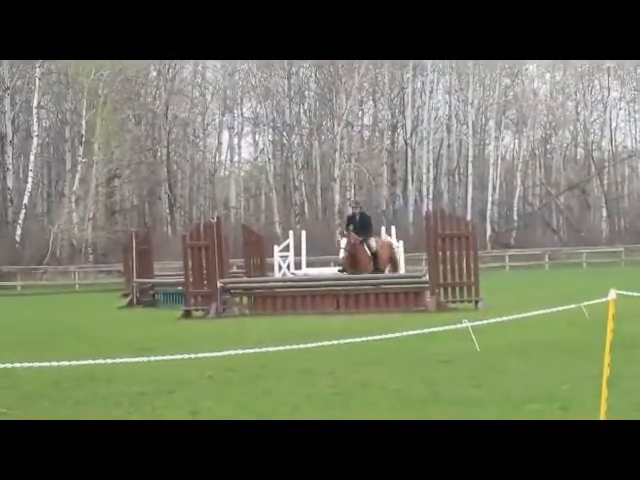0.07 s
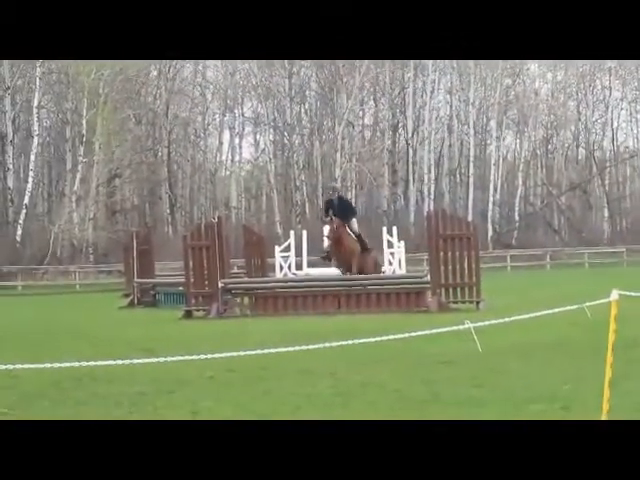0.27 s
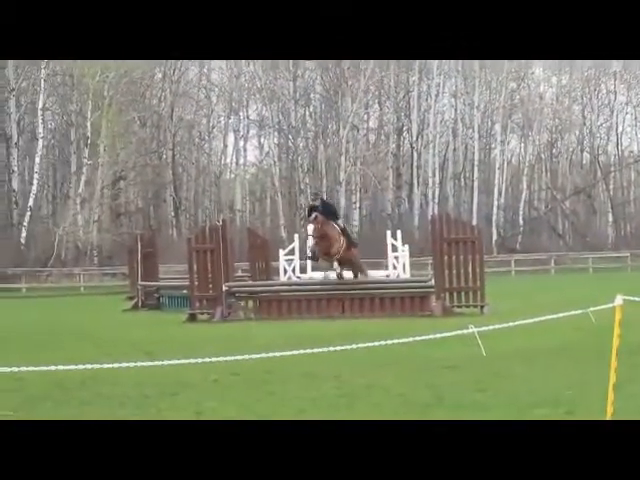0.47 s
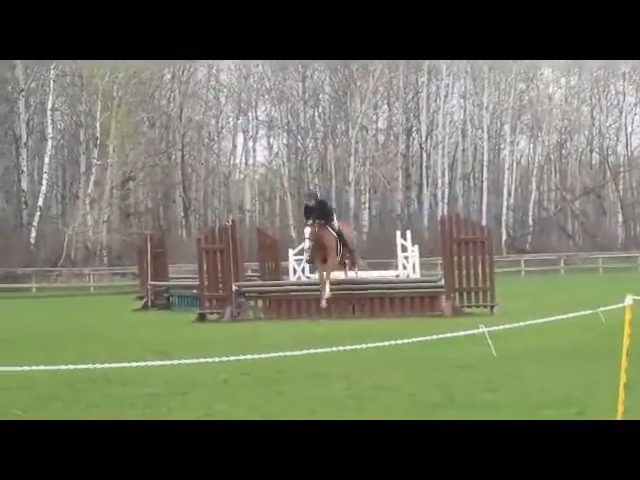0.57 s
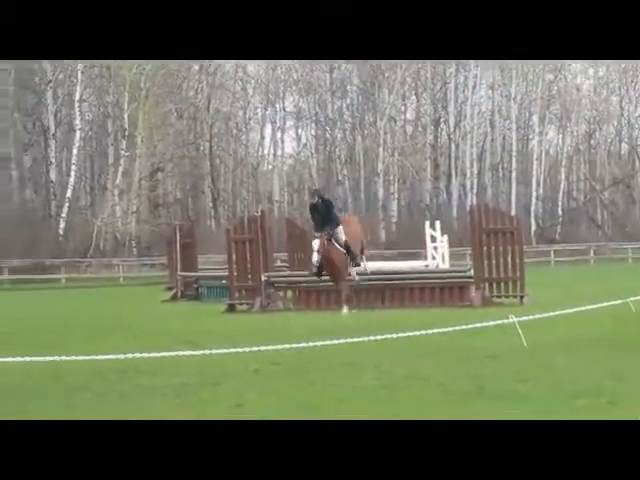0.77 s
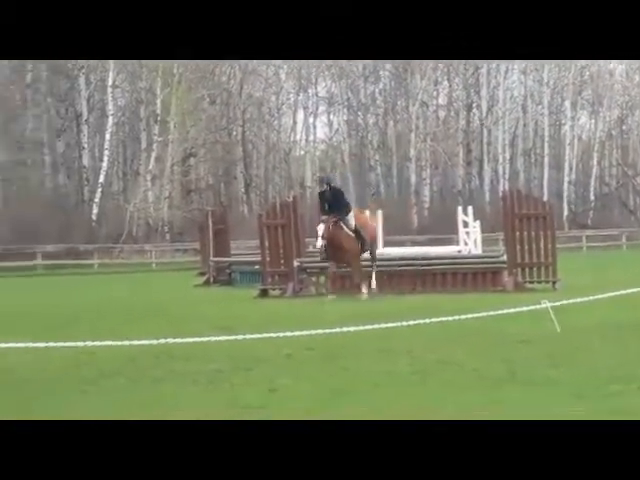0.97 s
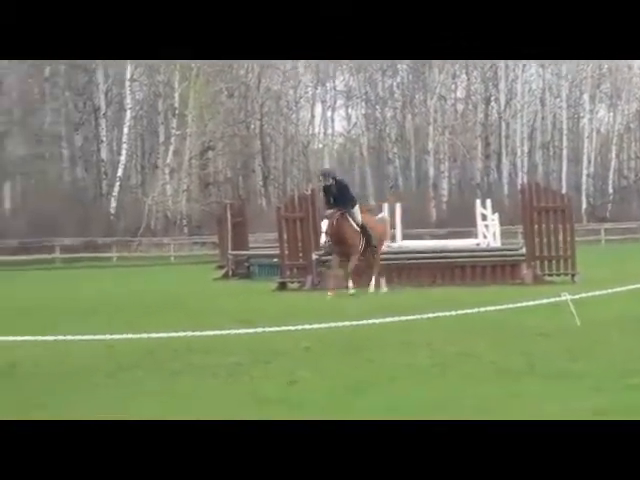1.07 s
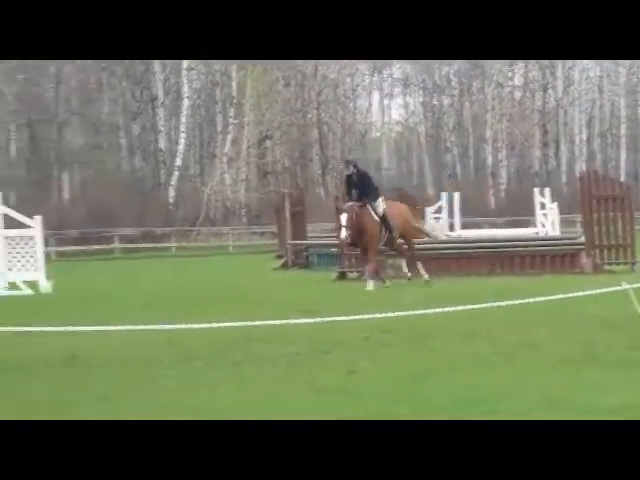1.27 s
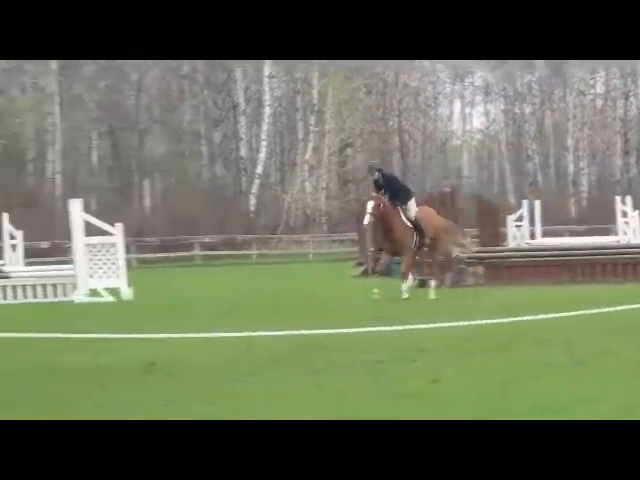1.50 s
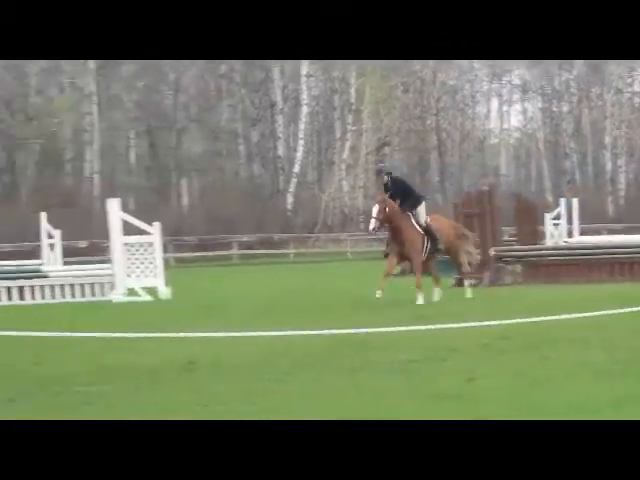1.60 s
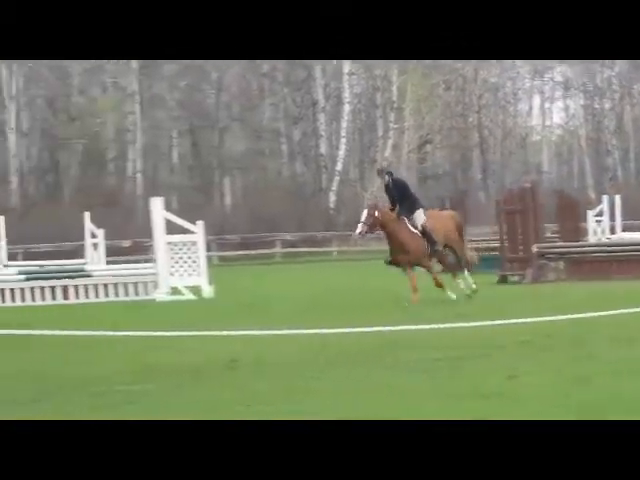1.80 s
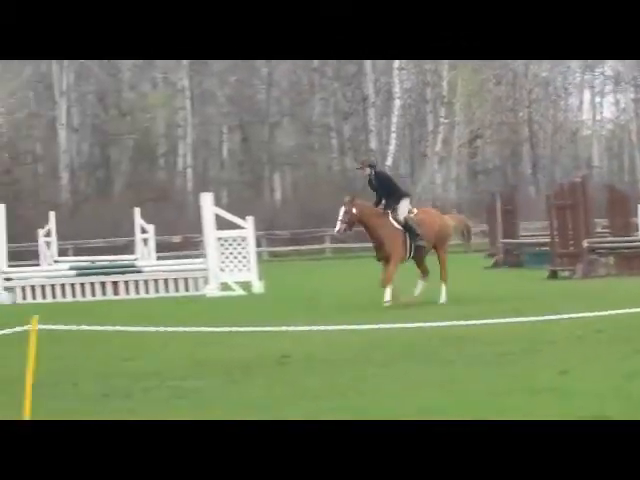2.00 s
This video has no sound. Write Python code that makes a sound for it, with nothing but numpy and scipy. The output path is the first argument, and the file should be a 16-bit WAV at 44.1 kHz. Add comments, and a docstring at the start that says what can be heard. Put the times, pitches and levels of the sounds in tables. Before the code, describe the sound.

Gusty wind buffets the microphone with low, uneven thumps and rumble.

```python
"""Gusty wind buffets a camera's microphone ports at the edge of a grass riding field. Eddies hit as low, hoof-
like thumps, louder on the left and in opposite polarity on the right, over an uneven rumble. A small plastic
part on the camera's right side ticks now and then, and two faint rustles sound much the same. A few tiny
crackles sound, and the open field hisses faintly behind."""
import sys
import numpy as np
from scipy import signal
from scipy.fft import rfft, irfft, next_fast_len
from scipy.io import wavfile

SR = 44100
rng = np.random.default_rng(int(sys.argv[2]) if len(sys.argv) > 2 else 0)


def to_wav(s):
    """Save 16-bit WAV."""
    ch = np.atleast_2d(s).T  # columns
    pcm = np.round(np.clip(ch, -1, 1) * 32767)  # PCM
    wavfile.write(sys.argv[1], SR, pcm.astype(np.int16))


N = 90404

# Each row: centre in seconds, level in dB, core half-width in ms, direction (1 pushes, -1 sucks).
EDDY_HITS = [(.0341, -29.5, 0.4, 1), (0.1011, -17, 1.38, -1), (0.2345, -14, 2.7, 1),
             (0.2774, -24, 0.98, -1), (0.2908, -16.5, 1.1, 1), (0.3075, -9.5, 1, -1),
             (0.3108, -10.5, 0.45, 1), (.3165, -12, 1.6, 1), (0.352, -15, 2.4, -1), (0.398, -13, 1.6, -1),
             (0.4035, -9.5, 0.65, -1), (0.4115, -22, 0.61, -1), (0.4177, -22.5, 0.69, -1),
             (0.4628, -31.5, 0.41, 1), (0.481, -21, 1.17, -1), (0.597, -16.5, 3.7, -1), (0.621, -23, 3, -1),
             (0.671, -18.5, 1.44, 1), (0.7013, -14.5, 1.4, 1), (0.7149, -6.5, 0.75, 1),
             (0.7489, 7.5, 1.3, 1), (0.751, -4.5, 1.16, -1), (.7546, 4, 0.24, 1), (0.7616, -1.5, 0.39, -1),
             (.764, -6, 0.24, 1), (0.773, -16, 1.1, -1), (0.8344, -16.5, 0.77, 1), (0.8503, -20.5, 0.5, -1),
             (0.8608, -21.5, 0.64, 1), (0.8986, -22, 0.5, -1), (1.135, -23.5, 1.5, 1),
             (1.262, -21.5, 2.1, 1), (1.3, -19.5, 2.3, 1), (1.3369, -10.5, 1.42, -1),
             (1.3438, -17, 0.77, -1), (1.3941, -25, 1.12, 1), (1.4946, -17, 1.36, 1), (1.5132, -23, 1.5, 1),
             (1.522, -17.5, 1.3, -1), (1.5485, -18.5, 0.57, 1), (1.5521, -22.5, 1, -1),
             (1.958, -26.5, 2.1, 1)]
EDDY_GAIN_DB, EDDY_LOW_CUT_HZ = 5.5, 77.7
WAKE_LEFT_DB, WAKE_RIGHT_DB, WAKE_DECAY_S = -14.5, -21, 0.0053
RIM_WIDTH_RATIO = 3.47


def eddies():
    """Eddies push or suck at the left port, with wakes on both. Narrow ones crack, wide ones thud."""
    t, pressure = np.arange(N) / SR, np.zeros((2, N))
    for centre_s, db, width_ms, direction in EDDY_HITS:
        width_s = width_ms / 1000
        u = (t - centre_s) / width_s
        white = rng.standard_normal((2, N))
        turbulence = unit(filtered(white, lambda hz: np.exp(-2 * np.pi * hz * width_s)))
        wake = np.exp(-abs(t - centre_s) / WAKE_DECAY_S) * (1 + np.tanh(u)) / 2
        pressure += amp(db) * amp([[WAKE_LEFT_DB], [WAKE_RIGHT_DB]]) * turbulence * wake
        core = 1 / (1 + u ** 2)
        rim = RIM_WIDTH_RATIO / (RIM_WIDTH_RATIO ** 2 + u ** 2)  # same area as the core
        pressure[0] += direction * amp(db) * (core - rim)
    return amp(EDDY_GAIN_DB) * filtered(pressure, port_low_cut)


def port_low_cut(hz):
    """The ports drop the eddies' deep bass steeply."""
    slope = (hz / EDDY_LOW_CUT_HZ) ** 4
    return slope / (1 + slope)


# Each row: time in seconds, buffeting level in dB.
GUST_LEVELS = [(0, -43.5), (.035, -40.5), (.07, -46), (.1, -43), (.15, -49), (.19, -42), (.23, -41),
               (.29, -36), (.325, -33), (.35, -36.5), (.375, -37), (.42, -37.5), (.46, -35.5), (.52, -42),
               (.57, -40), (.61, -35.5), (.65, -44.5), (.71, -31.5), (.74, -31.5), (.765, -32.5),
               (.795, -40.5), (.84, -34), (.92, -46), (.96, -43), (1.015, -38), (1.07, -48.5),
               (1.13, -38.5), (1.18, -48), (1.26, -45.5), (1.32, -43), (1.36, -45), (1.41, -42),
               (1.46, -53), (1.51, -38), (1.56, -38), (1.6, -52.5), (1.77, -48), (1.82, -54.5),
               (1.87, -46.5), (1.91, -62), (1.955, -43), (1.99, -50), (2.05, -38)]
# Each row: frequency in Hz, relative level in dB.
RUMBLE_SPECTRUM = [(20, -7.5), (40, -6.5), (70, 1), (120, 1), (200, -7.5), (300, -27), (500, -59.5),
                   (1000, -64), (3000, -100)]
FLUTTER_SPECTRUM = [(80, -10), (180, 1), (280, -5), (450, -21), (800, -37), (2000, -52.5)]
RUMBLE_GAIN_DB = 8.5
FLUTTER_DB, FLUTTER_DB_PER_DB, GUST_REF_DB = -46.5, 1.3, -44.5


def rumble():
    """Low noise on one port follows the gusts; a higher flutter grows faster and brightens them."""
    gust_db = curve(GUST_LEVELS)
    flutter_db = FLUTTER_DB + FLUTTER_DB_PER_DB * (gust_db - GUST_REF_DB)
    low = amp(gust_db + RUMBLE_GAIN_DB) * noise(RUMBLE_SPECTRUM)
    return low + amp(flutter_db) * noise(FLUTTER_SPECTRUM)


RIGHT_SHELTER_DB, OVERLOAD_DB, CROSSFEED = -4, -3.5, 0.43
WIND_LOW_CUT_HZ, PORT_COVER_HZ = 38, 3100


def wind():
    """Eddies and rumble softly saturate each capsule; each leaks inverted into the other channel."""
    pressure = eddies() + np.array([rumble(), amp(RIGHT_SHELTER_DB) * rumble()])
    ceiling = amp(OVERLOAD_DB)
    left, right = ceiling * np.tanh(pressure / ceiling)
    channels = np.array([left - CROSSFEED * right, right - CROSSFEED * left])
    return filtered(channels, wind_band)


def wind_band(hz):
    """The wind loses its deepest bass, and the port covers muffle it."""
    low_cut = hz ** 2 / np.hypot(hz ** 2, WIND_LOW_CUT_HZ ** 2)
    return low_cut / np.hypot(1, (hz / PORT_COVER_HZ) ** 4)


# Each row: start in seconds, level in dB. The two faintest, at 1.652 s and 1.848 s, are soft rustles given the
# same ringing sound.
TICKS_AND_RUSTLES = [(0.0936, -36.5), (0.5131, -35), (.845, -37.5), (1.0112, -36), (1.652, -52.5),
                     (1.762, -31.5), (1.848, -49.5)]
# Each row: frequency in Hz, level in dB, T60 in seconds.
PLASTIC_MODES = [(970, 5, .022), (1390, 7.5, 0.016), (2335, 1.5, 0.013), (2720, -6.5, 0.015),
                 (3370, -5.5, 0.0099), (4120, -14, 0.012), (5130, -16, 0.012)]
# Each row: frequency in Hz, relative level in dB.
SNAP_SPECTRUM = [(800, -10), (2000, 3.5), (5000, -2), (6500, -6), (12000, -34)]
TICK_ATTACK_S, MODE_SCATTER_DB = 0.00096, 1
SNAP_DB, SNAP_T60_S = -11.5, 0.0086
TICK_LEFT_DB, TICK_LEFT_LAG_S = -11.5, 0.00022


def ticks():
    """A plastic part near the right port snaps on contact and rings briefly, much alike each time; two faint
    rustles sound the same way."""
    right = np.zeros(N)
    for start_s, db in TICKS_AND_RUSTLES:
        t = np.maximum(np.arange(N) / SR - start_s, 0)
        ring = np.zeros(N)
        for hz, mode_db, t60_s in PLASTIC_MODES:
            struck_db = mode_db + MODE_SCATTER_DB * rng.standard_normal()
            ring += amp(struck_db - 60 * t / t60_s) * np.sin(2 * np.pi * hz * t)
        snap = amp(SNAP_DB - 60 * t / SNAP_T60_S) * noise(SNAP_SPECTRUM)
        attack = 1 - np.exp(-t / TICK_ATTACK_S)
        right += amp(db) * (ring + snap) * attack
    delayed = filtered(right, lambda hz: np.exp(-2j * np.pi * hz * TICK_LEFT_LAG_S))
    return np.array([amp(TICK_LEFT_DB) * delayed, right])


# Each row: start in seconds, level in dB.
CRACKLE_BURSTS = [(0.83, -57.5), (0.998, -56), (1.0193, -50.5)]
# Each row: frequency in Hz, relative level in dB.
CRACKLE_SPECTRUM = [(1500, -10), (5000, -20.5), (8000, -22), (12000, -23)]
CRACKLE_T60_S = 0.023


def crackles():
    """Tiny, dry bursts of bright noise."""
    envelope = np.zeros(N)
    for start_s, db in CRACKLE_BURSTS:
        t = np.arange(N) / SR - start_s
        envelope += (t > 0) * amp(db - 60 * abs(t) / CRACKLE_T60_S)
    return envelope * np.array([noise(CRACKLE_SPECTRUM), noise(CRACKLE_SPECTRUM)])


# Each row: frequency in Hz, relative level in dB.
RUSH_SPECTRUM = [(100, -3.5), (300, -2), (600, -1.5), (1000, -3.5), (1800, -9.5), (3200, -18), (6000, -28),
                 (12000, -42)]
HISS_SPECTRUM = [(1000, -8), (4000, 0.5), (7000, 1), (10000, -1.5), (11500, -5.5), (12500, -13)]
# Each row: time in seconds, level in dB.
HISS_LEVELS = [(0, -75.5), (.2, -76.5), (.7, -74.5), (.78, -75), (.92, -72.5), (1.02, -76), (1.12, -70),
               (1.22, -73), (1.32, -72.5), (1.38, -72), (1.5, -73.5), (1.6, -70), (1.72, -73), (1.78, -72),
               (1.84, -70), (1.93, -70.5), (2.05, -69)]
RUSH_DB, RUSH_DB_PER_S, HISS_GAIN_DB = -62, 1.5, 1


def field():
    """The distant rush of open air grows slowly, with a gently wavering hiss."""
    t = np.arange(N) / SR
    rush = amp(RUSH_DB + RUSH_DB_PER_S * t) * stereo_noise(RUSH_SPECTRUM, side_db=-4)
    hiss = amp(curve(HISS_LEVELS) + HISS_GAIN_DB) * stereo_noise(HISS_SPECTRUM, side_db=-3.5)
    return rush + hiss


def amp(db):
    """Decibels to gain."""
    return 10 ** (np.asarray(db) / 20)


def unit(x):
    """Scaled to rms 1."""
    return x / np.sqrt(np.mean(x ** 2) + 1e-20)


def curve(rows):
    """(s, value) points as one value per sample."""
    return np.interp(np.arange(N) / SR, *np.transpose(rows))


def filtered(x, response):
    """x through a frequency response."""
    size = next_fast_len(N + SR // 2)
    hz = np.fft.rfftfreq(size, 1 / SR)
    return irfft(rfft(x, size) * response(hz), size)[..., :N]


def noise(spectrum):
    """Noise of rms 1 coloured by (Hz, dB) points."""
    hz, db = np.transpose(spectrum)
    white = rng.standard_normal(N)
    return unit(filtered(white, lambda f: amp(np.interp(np.log(f + 1), np.log(hz + 1), db))))


def stereo_noise(spectrum, side_db):
    """Mid/side noise of rms 1."""
    mid, side = noise(spectrum), amp(side_db) * noise(spectrum)
    return unit(np.array([mid + side, mid - side]))


def scene():
    """Wind in front, ticks and crackles, the field behind."""
    return wind() + ticks() + crackles() + field()


BAND_LIMIT_HZ = 12500


def record(dry):
    """The camera keeps nothing above its band limit."""
    return filtered(dry, lambda hz: hz < BAND_LIMIT_HZ)


dry = scene()
out = record(dry)
to_wav(out)
```